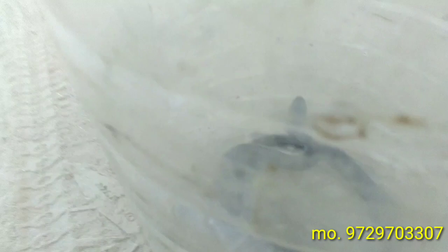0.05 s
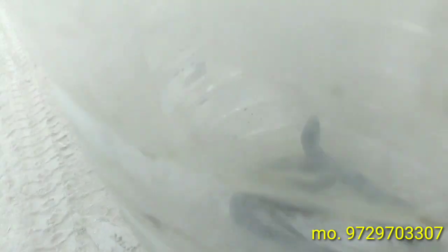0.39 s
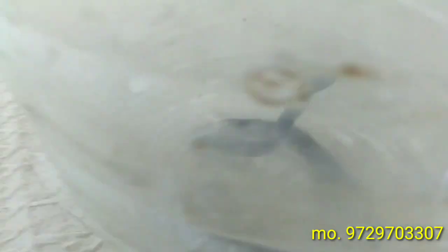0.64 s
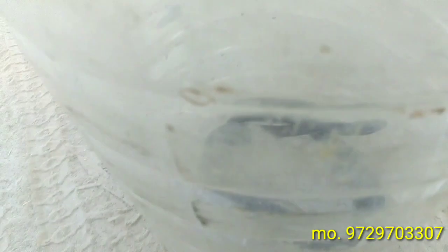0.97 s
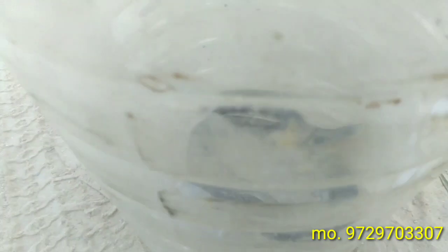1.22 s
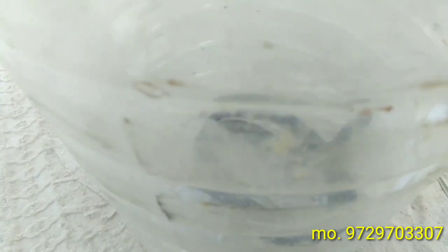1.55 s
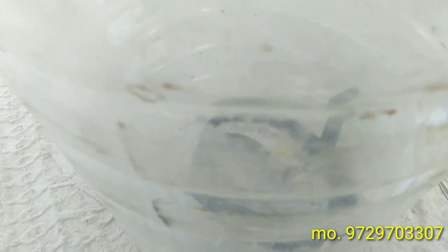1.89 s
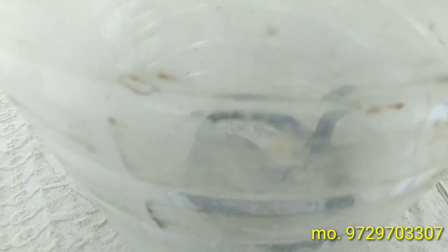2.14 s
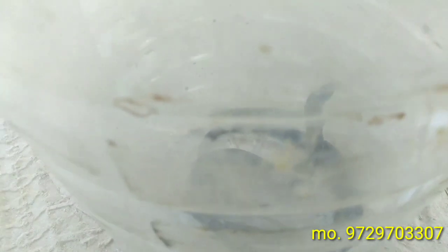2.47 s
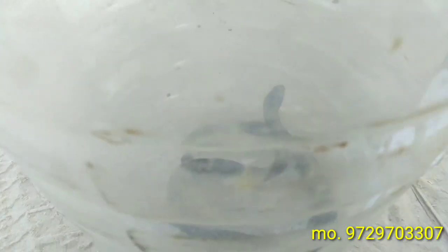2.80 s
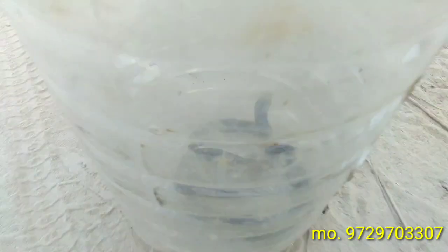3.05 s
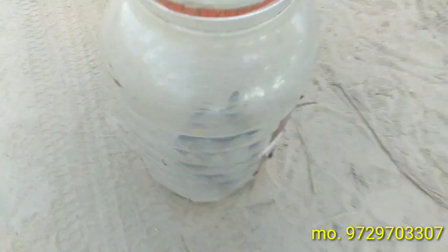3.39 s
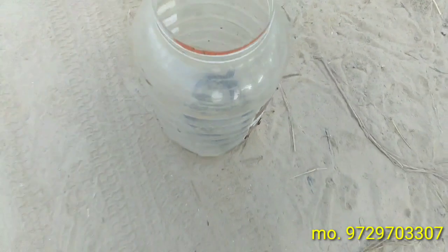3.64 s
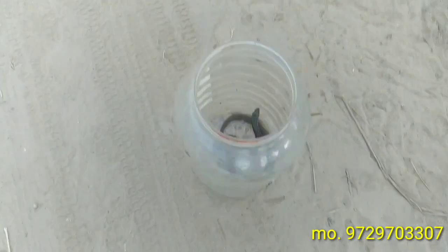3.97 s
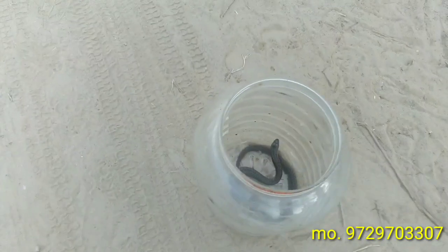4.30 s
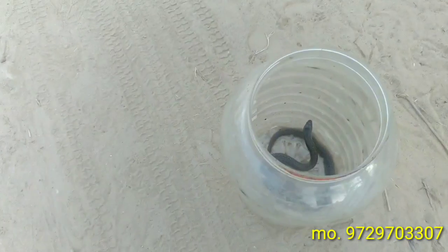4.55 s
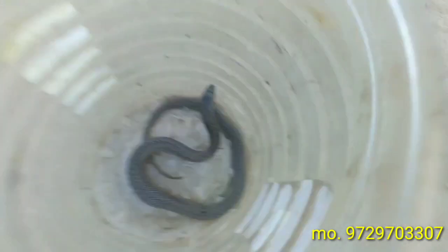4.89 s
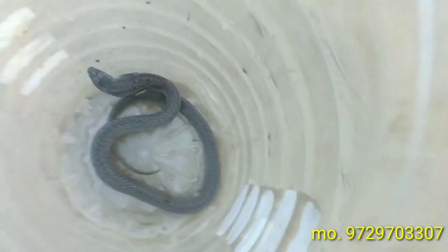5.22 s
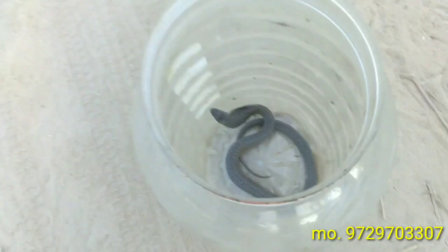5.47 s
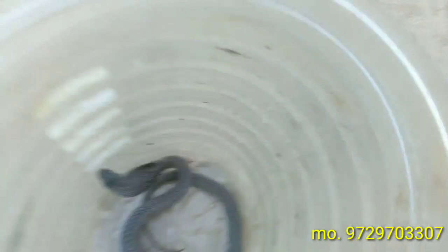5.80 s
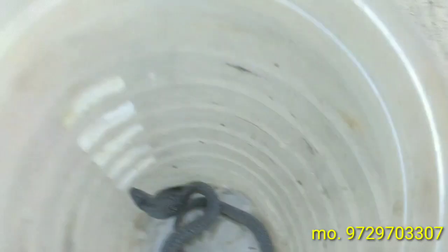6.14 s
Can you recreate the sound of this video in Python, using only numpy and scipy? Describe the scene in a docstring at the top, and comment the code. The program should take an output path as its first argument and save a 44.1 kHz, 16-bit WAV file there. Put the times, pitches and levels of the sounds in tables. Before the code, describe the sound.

A large plastic jar is turned on sandy ground, heard from very close. From the start until about 2.3 seconds it scrapes in short, uneven pushes, with a low judder, a gritty sand hiss and light hollow knocks of its wall. The strongest knocks and scrapes come between 1 and 1.8 seconds, mixed with tiny groans of rubbing plastic. From about 2.5 seconds dry, hissy brushing swishes close on the left, strongest around 3.4 and 4.2 seconds, while a few more light knocks fall between 3 and 4.3 seconds. At about 4.9 and 5.2 seconds the rim is bumped twice: hollow thuds with a dry clack, the loudest sounds, each followed by a brief low hum from inside the jar. Faint grit ticks, swishes and small scrapes continue to about 6 seconds. Quiet, steady outdoor air lies underneath throughout.

```python
"""Plastic jar turned on sand

A large empty plastic jar turns on sandy ground with a camera held against it: stick-slip scrapes and
light knocks ring its wall. The camera backs off, with dry brushing close to its left microphone port,
and bumps the rim twice; while it hangs in the jar's mouth the air inside hums.
Quiet outdoor air lies underneath."""
import sys
import numpy as np
from scipy import signal
from scipy.fft import rfft, irfft, next_fast_len
from scipy.io import wavfile
from scipy.ndimage import uniform_filter1d, minimum_filter1d, map_coordinates

SR = 44100
rng = np.random.default_rng(int(sys.argv[2]) if len(sys.argv) > 2 else 0)


def unload_wav(signal):
    """Save mono or channel-first audio to the path in sys.argv[1] as 16-bit WAV at rate SR, clipped to [-1, 1]."""
    wavfile.write(
        sys.argv[1],
        SR,
        np.round(np.clip(np.atleast_2d(signal).T, -1, 1) * 32767).astype(np.int16),
    )


N = 271068


def amp(db):
    """Decibels to gain."""
    return 10 ** (np.asarray(db) / 20)


def unit(x):
    """Scale to rms 1."""
    return x / np.sqrt(np.mean(x ** 2) + 1e-20)


def along(points, hz):
    """Read a curve of (Hz, value) points on a log frequency axis."""
    point_hz, values = np.transpose(points)
    return np.interp(np.log(hz + 1), np.log(point_hz + 1), values)


def wobble(rate):
    """A smooth random curve with `rate` knots a second."""
    return map_coordinates(rng.standard_normal(int(N * rate / SR) + 4), [np.arange(N) * rate / SR])


def filtered(x, response):
    """Equalise x with a gain given as a function of frequency."""
    size = next_fast_len(N + SR // 4)
    return irfft(rfft(x, size) * response(np.fft.rfftfreq(size, 1 / SR)), size)[..., :N]


def body(spectrum, modes=(), size=4096):
    """Minimum-phase impulse response of a tone curve lifted at its modes."""
    hz = np.fft.rfftfreq(size, 1 / SR)
    peaks_db = sum(lift / (1 + (2 * (hz - centre) / width) ** 2) for centre, width, lift in modes)
    cepstrum = irfft(np.log(amp(along(spectrum, hz) + peaks_db)))
    cepstrum[1:size // 2] *= 2
    cepstrum[size // 2 + 1:] = 0
    return irfft(np.exp(rfft(cepstrum)))


def through(x, response):
    """Ring both channels through an impulse response."""
    return signal.oaconvolve(x, response[None], axes=1)[:, :x.shape[1]]


def pan(lean_db):
    """Constant-power left and right gains; positive leans left."""
    gains = amp(np.array([lean_db, -lean_db]).reshape(2, -1) / 2)
    return gains / np.sqrt(np.mean(gains ** 2, axis=0))


def add(track, start_s, sound):
    """Mix a short sound into the track."""
    part = track[:, round(start_s * SR):][:, :sound.shape[1]]
    part += sound[:, :part.shape[1]]


def strokes(start_s, length_s, level_db, rise_db_per_s, fall_db_per_s, arch_db):
    """Envelope of one or more strokes, summed in power: each rises, arches and falls away."""
    start_s, length_s, level_db = (np.reshape(x, (-1, 1)) for x in (start_s, length_s, level_db))
    t = np.arange(0, N, 32) / SR
    since = t - start_s
    held = np.clip(since, 0, length_s)
    db = level_db - arch_db * (2 * held / length_s - 1) ** 2
    db = db - rise_db_per_s * np.maximum(held - since, 0) - fall_db_per_s * np.maximum(since - held, 0)
    return np.interp(np.arange(N) / SR, t, np.linalg.norm(amp(db), axis=0))


def slips(per_s, spread_db, smooth):
    """Friction: tiny random slips of uneven size over a share of smooth sliding noise."""
    size = (rng.random(N) < per_s / SR) * amp(spread_db * np.clip(rng.standard_normal(N), -2, 2))
    return unit(size * rng.standard_normal((2, N))) + smooth * rng.standard_normal((2, N))


def shifting(x, depth_db, size):
    """Resonances come and go as the contact shifts; patch size is in steps of (43 Hz, 12 ms)."""
    spectra = signal.stft(x, nperseg=1024)[2]
    patches = uniform_filter1d(rng.standard_normal(spectra.shape[1:]), size=size[0], axis=0)
    patches = uniform_filter1d(patches, size=size[1], axis=1)
    return unit(signal.istft(spectra * amp(depth_db * unit(patches)), nperseg=1024)[1][:, :N])


def burst(t, t60_s, response):
    """A dying spray of micro-contacts rung through a body; rms 1 over its first 10 ms."""
    spray = through(rng.standard_normal((2, len(t))) * amp(-60 * t / t60_s), response)
    return spray / np.sqrt(np.mean(spray[:, :SR // 100] ** 2, axis=1, keepdims=True))


# How alike the two ports sound: freq_hz, coherence
PORT_COHERENCE = [(100, 0.67), (700, 0.47), (1400, 0.08), (3000, 0.047), (15000, 0.36)]


def ports(pair):
    """Blend two unrelated noises into left and right, narrowest in the bass and widest near 3 kHz."""
    angle = lambda hz: np.arccos(np.clip(along(PORT_COHERENCE, hz), -1, 1)) / 2
    mid, side = filtered(pair, lambda hz: np.array([np.cos(angle(hz)), np.sin(angle(hz))]))
    return unit(np.array([mid + side, mid - side]))


# Tone curve of the open air: freq_hz, gain_db
AIR_TONE = [(30, -57), (80, -20.5), (190, 8.5), (400, -1), (800, -6.5), (3500, -18), (16000, -24.5)]


def outdoor_air():
    """A faint, nearly steady bed of low air noise."""
    return amp(-48.5 + 0.71 * wobble(7.3)) * ports(through(rng.standard_normal((2, N)), body(AIR_TONE)))


# Swells of the jar's air after each rim bump: start_s, length_s, level_db
HUMS = [(5.044, 0.063, -21), (5.235, 0.052, -23)]
CAVITY_HZ, FIRST_BUMP_S = 214.5, 4.942


def cavity_hum():
    """The jar's air spring hums after the bumps and stirs faintly with each scrape."""
    phase = 2 * np.pi * np.cumsum(CAVITY_HZ * (1 + .004 * wobble(19))) / SR
    air_column = amp(-37 + 3 * wobble(40)) * np.sin(3.3 * phase + wobble(60))
    start_s, length_s, db = np.transpose(HUMS)
    swell = strokes(start_s, length_s, db, rise_db_per_s=207, fall_db_per_s=288, arch_db=-.5)
    tail = strokes(start_s, length_s, db - 15.5, rise_db_per_s=207, fall_db_per_s=69, arch_db=-.5)
    judder_db = np.transpose(SCRAPES)[2]
    struck = np.clip((np.arange(N) / SR - FIRST_BUMP_S) / .005, 0, 1)
    envelope = struck * np.hypot(swell, tail) + pushes(judder_db - 45)
    return envelope * pan(-5) * np.sqrt(2) * (np.sin(phase) + air_column)


# Tone curve of a cracking grain: freq_hz, gain_db
TICK_TONE = [(800, -72), (3000, 10.5), (8000, 15), (12000, 12.5), (16000, 4)]


def grit_tick(t, db):
    """A grain cracks, mostly at the left port."""
    return amp(db - 8.5) * amp([[0], [-11]]) * burst(t, t60_s=.011, response=body(TICK_TONE))


# Stray grains: start_s, relative_level_db
LOOSE_GRAINS = [(5.483, -29), (5.49, -37), (5.606, -29.5), (5.629, -33)]


def loose_grains():
    """A few loose grains tick near the left port."""
    track, t = np.zeros((2, N)), np.arange(SR // 5) / SR
    for start_s, db in LOOSE_GRAINS:
        add(track, start_s, grit_tick(t, db))
    return track


# Tone curves of the fine and the coarse hiss: freq_hz, gain_db
FINE_TONE = [(2500, -18), (5000, -15), (7000, -6), (9500, -0.5), (11000, -4), (13000, -14.5), (15800, -19)]
COARSE_TONE = [(300, -28), (1100, 2.5), (2400, 4.5), (4500, 6.5), (6500, 3.5), (10000, -0.5)]


def grain_hiss(fine_gain, coarse_gain, sheen_gain):
    """Dense dry grains hiss in clumps at a port that rings broadly near 10 kHz; larger ones tick."""
    grains = lambda tone: unit(through(slips(per_s=6000, spread_db=3, smooth=.8), body(tone)))
    clumped = lambda x: shifting(x, depth_db=2.1, size=(36, 2))
    sheen_tone = [(8000, -12), (13000, 5.5), (15000, 1.5)]  # the glassy top: freq_hz, gain_db
    fine = clumped(shifting(grains(FINE_TONE), depth_db=2.6, size=(4, 4)))
    sheen = clumped(shifting(grains(sheen_tone), depth_db=2.6, size=(4, 4)))
    coarse = shifting(grains(COARSE_TONE), depth_db=3.2, size=(7, 4))
    ticks = amp(-24) * unit(through(slips(per_s=150, spread_db=1, smooth=0), body(TICK_TONE)))
    pressure = amp(0.5 * wobble(21.59) + 0.7 * wobble(70))
    return pressure * (fine_gain * (fine + ticks) + sheen_gain * sheen + coarse_gain * coarse)


# Dry swishes at the left port: start_s, length_s, fine_db, coarse_over_fine_db, sheen_over_fine_db
SWISHES = [(2.515, 0.49, -37.5, -8.5, -2.5), (3.066, 0.21, -34.5, -9, 1), (3.308, 0.05, -26, -2.5, -4),
           (3.362, 0.045, -25.5, -2.5, -6), (3.388, 0.095, -20.5, -12.5, -4.5), (3.466, 0.2, -32.5, -7, -3),
           (3.663, 0.59, -42, -4.5, -4), (3.951, 0.57, -31.5, -5, -8), (4.195, 0.13, -23.5, -10.5, -3),
           (4.464, 0.17, -32, -7.5, -4), (4.654, 0.27, -30.5, -7.5, 1), (5.078, 0.16, -39.5, -7, -1.5),
           (5.297, 0.2, -36, -11.5, -2), (5.625, 0.23, -34.5, -5, -3.5), (5.913, 0.035, -36, -6, -5),
           (6.012, 0.1, -39.5, -14, -3)]


def brushing():
    """Sand hisses with each scrape, louder on the left; the swishes barely reach the right port."""
    *_, hiss_db, _, _ = np.transpose(SCRAPES)
    sand = pushes(hiss_db)
    sand_fine = amp([[0], [-16]]) * sand
    sand_coarse = amp(-5.5) * sand_fine
    sand_sheen = amp(-7.5) * amp([[0], [-7.5]]) * sand
    start_s, length_s, fine_db, coarse_db, sheen_db = np.transpose(SWISHES)

    def swish(db, rest_db):
        """Brush strokes over a faint floor: the grip never lies quite still."""
        gain = strokes(start_s, length_s, db, rise_db_per_s=299, fall_db_per_s=315, arch_db=3.5)
        return amp([[0], [-34]]) * np.hypot(gain, amp(rest_db))

    fine = np.hypot(sand_fine, swish(fine_db, rest_db=-48))
    coarse = np.hypot(sand_coarse, swish(fine_db + coarse_db, rest_db=-57))
    sheen = np.hypot(sand_sheen, swish(fine_db + sheen_db, rest_db=-56.5))
    return grain_hiss(fine, coarse, sheen)


# Short groans and a squeak: start_s, length_s, pitch_hz, level_db, lean_left_db
GROANS = [(1.313, 0.032, 207.5, -16.5, -4), (1.696, 0.038, 250, -23, -7), (2.175, 0.018, 217.5, -23, -22),
          (2.231, 0.047, 733, -34.5, 0)]


def groans():
    """The slide locks into regular stick-slip: an unsteady tone with a weak octave."""
    track = np.zeros((2, N))
    for start_s, length_s, hz, db, lean_db in GROANS:
        phase = 2 * np.pi * np.cumsum(hz * (1 + 0.044 * wobble(90))) / SR
        gain = strokes(start_s, length_s, db, rise_db_per_s=5000, fall_db_per_s=700, arch_db=0)
        track += pan(lean_db) * gain * np.sqrt(2) * (np.sin(phase) + amp(-14) * np.sin(2 * phase))
    return track


PUSH_RISE_DB_PER_S, PUSH_FALL_DB_PER_S, PUSH_ARCH_DB = 723, 534, 4


def pushes(level_db):
    """Envelope of the scrapes: each push catches fast, peaks midway and lets go a little more slowly."""
    start_s, length_s = np.transpose(SCRAPES)[:2]
    return strokes(start_s, length_s, level_db, PUSH_RISE_DB_PER_S, PUSH_FALL_DB_PER_S, PUSH_ARCH_DB)


# Modes of the jar's wall and air column: freq_hz, width_hz, lift_db
JAR_MODES = [(230, 25, 1), (342, 190, 4.5), (705, 400, 7.5), (1050, 170, 4.5), (1420, 250, 8.5),
             (1730, 63, 6.5), (2440, 67, 2), (3470, 88, 10), (3780, 55, 8)]


def rubbed_wall(friction, tone, spots_hz, level_db, width_hz, lift_db, fall_db_per_s=PUSH_FALL_DB_PER_S):
    """Slips ring the wall, push by push; each push lifts the resonance of the spot it rubs."""
    track, friction = np.zeros((2, N)), ports(friction)
    for (start_s, length_s, *_), hz, db in zip(SCRAPES, spots_hz, level_db):
        part = slice(max(round((start_s - .06) * SR), 0), round((start_s + length_s + .15) * SR))
        gain = strokes(start_s, length_s, db, PUSH_RISE_DB_PER_S, fall_db_per_s, PUSH_ARCH_DB)
        wall = body(tone, JAR_MODES + [(hz, width_hz, lift_db)])
        track[:, part] += gain[part] * unit(through(friction[:, part], wall))
    return track


# Tone curves of a scrape's low judder, mid rasp and gritty crunch: freq_hz, gain_db
JUDDER_TONE = [(30, -29), (90, -34), (130, -18.5), (180, -3), (300, -12), (460, -10), (750, -28),
               (2000, -46)]
RASP_TONE = [(250, -34), (430, 4), (580, -5), (1150, -3), (1500, -15.5), (2500, -47), (6000, -72)]
CRUNCH_TONE = [(700, -6), (1200, -10.5), (1550, 3), (2400, 6), (3100, -4), (5000, -7), (16000, -53)]
# Pushes that scrape the jar: start_s, length_s, judder_db, rasp_over_judder_db,
# crunch_over_judder_db, hiss_db, judder_hz, rasp_hz
SCRAPES = [(0.0, 0.1, -32.5, -7.5, -10, -38, 326, 1110), (0.126, 0.086, -27, -8, -13, -37.5, 344, 1080),
           (0.23, 0.047, -24.5, -5, -10, -30, 340, 1440), (0.277, 0.068, -32.5, 2, -0.5, -30, 306, 1080),
           (0.373, 0.16, -28, -4, -6, -27, 362, 1103), (0.54, 0.18, -33.5, -8.5, -9.5, -36.5, 230, 1160),
           (0.717, 0.11, -37, -7.5, -11, -41.5, 220, 700), (0.88, 0.13, -30.5, -.5, 0, -22.5, 293, 1460),
           (1.025, .089, -31, -15, -19, -45.5, 224, 700), (1.298, 0.086, -23.5, -5, -8, -21, 328, 690),
           (1.39, .12, -34, -1, -1, -27, 202, 630), (1.598, 0.022, -32, -6.5, -10, -41.5, 245, 1390),
           (1.68, 0.076, -22, -6, -10, -22, 200, 720), (1.763, 0.043, -30, -6, -10, -27.5, 190, 1040),
           (2.056, 0.027, -33, -15, -32, -62, 200, 700), (2.107, .16, -26.5, -6.5, -9, -26, 190, 1040),
           (2.781, 0.097, -45.5, -2.5, -7, -51, 240, 775), (3.417, 0.019, -30, -11, -17, -58, 405, 840),
           (3.522, 0.17, -41.5, -3, -5, -57, 173, 660), (4.075, 0.25, -47.5, -2, 2, -54, 242, 1410),
           (5.064, 0.072, -37.5, -8, -3, -62, 230, 720), (5.727, 0.016, -37.5, 0.5, -9, -55, 280, 640),
           (5.791, 0.037, -36, -3, -12, -33.5, 370, 670), (5.916, 0.031, -38, -2, -11, -52, 397, 830),
           (6.058, 0.0092, -38.5, -1.5, -11, -55, 310, 690)]


def scraping():
    """Slow stick-slip shakes the whole jar, quicker slips rasp in its wall, and single grains crunch."""
    _, _, judder_db, rasp_db, crunch_db, _, judder_hz, rasp_hz = np.transpose(SCRAPES)
    slow = slips(per_s=420, spread_db=5, smooth=0.65)
    quick = slips(per_s=700, spread_db=1.5, smooth=1.0)
    judder = rubbed_wall(slow, JUDDER_TONE, judder_hz, judder_db, width_hz=210, lift_db=7.5,
                         fall_db_per_s=308)  # outlasts the grit
    rasp = rubbed_wall(quick, RASP_TONE, rasp_hz, judder_db + rasp_db, width_hz=140, lift_db=8)
    grit = ports(through(slips(per_s=600, spread_db=3, smooth=1.0), body(CRUNCH_TONE, JAR_MODES)))
    grit_gain = np.hypot(pushes(judder_db + crunch_db), amp(-63))  # the grip rubs faintly between pushes
    crunch = shifting(grit, depth_db=3.2, size=(6, 6)) * grit_gain
    catching = amp(1.8 * wobble(45))
    return pan(-1) * catching * (judder + rasp + crunch)


# Tone curve of a knock's clack: freq_hz, gain_db
KNOCK_CLACK_TONE = [(150, -32.5), (400, 4), (900, -3), (1500, -9.5), (2300, -8.5), (3200, -17.5),
                    (6000, -28), (16000, -57)]
# Partials of the struck spot: pitch_ratio, gain_db, t60_s
SPOT_PARTIALS = [(.66, -13, 0.011), (.86, -6, .016), (1, 1, 0.036), (1.17, -5, 0.013), (1.9, -18, 0.03)]
# Knocks on the wall, levels before their trims: start_s, thud_hz, thud_t60_s, thud_db,
# hardness_db (clack over thud), tick_db, lean_left_db, spot_hz, ring_db
KNOCKS = [(0.128, 376, 0.046, -33, -0.5, -31, 6, 1110, -45),
          (0.184, 444, 0.019, -28.5, -8, -48, 7, 1450, -42),
          (0.633, 218, 0.031, -20.5, -17, -40, -4.5, 445, -31),
          (0.668, 280, 0.043, -23, -4, -23.5, 10, 1130, -42),
          (0.755, 660, 0.045, -25, -13, -51, -10, 1480, -36),
          (0.778, 310, 0.02, -20.5, -7.5, -24.5, 4, 1260, -31),
          (1.0434, 382, 0.065, -22.5, 7.5, -16.5, -8, 2010, -15.5),
          (1.086, 345, 0.036, -34, 0, -51, -12, 1100, -41),
          (1.263, 234, 0.047, -10.5, -9, -17, -3.5, 496, -16),
          (1.366, 200, 0.048, -19.5, -0.5, -16, -2, 1740, -14),
          (1.372, 505, 0.019, -21, 6, -12, -5, 1720, -21),
          (1.397, 510, 0.088, -25.5, 6.5, -36, -2, 1650, -26),
          (1.402, 700, 0.034, -31, 0, -50, -4, 1040, -23),
          (1.661, 196, 0.066, -19.5, -15, -52, -13, 476, -32),
          (1.67, 328, 0.021, -21.5, -2, -21, -5, 1420, -33),
          (1.687, 274, 0.069, -18.5, 4, -35, -5, 1740, -20),
          (1.812, 210, .084, -22.5, -7.5, -56, -10, 650, -27.5),
          (2.044, 204, 0.031, -31, -8, -60, -13, 480, -37), (2.073, 240, .041, -28, -15, -49, 16, 650, -38),
          (2.144, 744, 0.056, -23.5, -1, -45, 3, 1050, -26),
          (2.247, 605, 0.064, -28.5, 0, -18, -7, 1500, -30), (2.262, 730, 0.13, -28, 3, -36, -2, 990, -23),
          (2.98, 248, 0.019, -20, -14.5, -26, 6, 1400, -43),
          (2.984, 500, 0.056, -29, -12, -50, 2, 1400, -44), (3.031, 488, 0.073, -25, -8, -14, 6, 2120, -32),
          (3.041, 503, .049, -33, 1, -22, 21, 1870, -26), (3.172, 263, 0.061, -40, 0, -20, 1, 1930, -53),
          (3.406, 358, 0.03, -21.5, -8, -42, -31, 855, -35),
          (3.84, 209, 0.06, -21.5, -10.5, -58, -28, 560, -27),
          (3.919, 640, 0.019, -41, -1, -33, 6, 1100, -46), (4.22, 276, 0.031, -32.5, -11, -41, 0, 600, -43),
          (4.277, 362, .027, -31.5, -6, -41, -23, 1510, -46),
          (5.71, 244, 0.02, -29.5, -15, -48, 7, 700, -47)]
CONTACT_WIDTH_RATIO = 0.62  # scales the width of the jar's modes during a knock


def knocks():
    """Each contact is a damped thud of flexing plastic, a clack and ring of the spot, and a grit tick."""
    track, t = np.zeros((2, N)), np.arange(SR // 5) / SR
    modes = [(hz, width * CONTACT_WIDTH_RATIO, lift) for hz, width, lift in JAR_MODES]
    for start_s, hz, t60_s, thud_db, hardness_db, tick_db, lean_db, spot_hz, ring_db in KNOCKS:
        # the dent is stiffest at first, so the thud starts sharp
        phase = 2 * np.pi * np.cumsum(hz * (1 + .3 * np.exp(-t / .002))) / SR
        thud = -np.sin(phase) * amp(-60 * t / t60_s) * (1 - np.exp(-t / .0016))
        thud = amp(thud_db - 2) * thud / np.std(thud[:SR // 100])
        # a harder knock favours its own spot more
        spot_mode = (spot_hz, spot_hz / 2, max(8.5 + 0.7 * hardness_db, 0))
        clack = burst(t, t60_s=.022, response=body(KNOCK_CLACK_TONE, modes + [spot_mode]))
        ring = sum(amp(db - 60 * t / life) * np.sin(2 * np.pi * ratio * spot_hz * rng.normal(1, .012) * t)
                   for ratio, db, life in SPOT_PARTIALS)
        wall = amp(thud_db + hardness_db) * clack + amp(ring_db) * ring
        add(track, start_s, pan(lean_db) * thud + pan(lean_db / 2) * wall + grit_tick(t, tick_db))
    return track


# Tone curve of the rim's clack: freq_hz, gain_db
RIM_CLACK_TONE = [(150, -33), (400, 6.5), (600, 4.5), (1080, -8), (1550, -5.5), (1950, -15), (2500, -15.5),
                  (4000, -28), (16000, -55)]
# Two rim bumps and their rebounds, levels before their trims:
# start_s, thud_hz, thud_db, clack_db, tick_db, lean_left_db
RIM_BUMPS = [(4.9408, 277, -4, -12.5, -12, -6.5), (4.953, 258, -1, -14, -27, -17),
             (5.153, 265, -5.5, -11, -12.5, -4), (5.164, 260, -13, -36, -42, -14),
             (5.1685, 297, -6, -22.5, -42, -24), (5.1895, 257, -7.5, -27, -54, -13),
             (5.1986, 263, -8, -29, -57, -12)]
BUMP_PEAK_S, BUMP_TIGHTNESS = 0.0032, 1.74  # a tighter thud is gone sooner


def rim_bumps():
    """The camera meets the rim with a dry clack; the neck gives way in a hollow, quickly damped thud."""
    track, t = np.zeros((2, N)), np.arange(SR // 10) / SR
    swell = (t / BUMP_PEAK_S * np.exp(-t / BUMP_PEAK_S)) ** BUMP_TIGHTNESS
    for start_s, hz, thud_db, clack_db, tick_db, lean_db in RIM_BUMPS:
        thud = -np.sin(2 * np.pi * hz * t) * swell
        thud = amp(thud_db - 4) * thud / np.std(thud[:SR // 100])
        clack = amp(clack_db) * burst(t, t60_s=0.033, response=body(RIM_CLACK_TONE))
        add(track, start_s, pan(lean_db) * thud + pan(lean_db / 2) * clack + grit_tick(t, tick_db))
    return track


def scene():
    """The stereo mix at the two ports: friction, impacts, the jar's hum and the air bed."""
    friction = scraping() + groans() + brushing()
    impacts = knocks() + loose_grains() + rim_bumps()
    return friction + impacts + cavity_hum() + outdoor_air()


LOW_CUT_HZ, HIGH_CUT_HZ = 164, 15750


def record(dry):
    """The ports lose the deep bass, a quick limiter holds the hardest bumps, and the very top is cut."""
    thinned = filtered(dry, lambda hz: 1j * hz / (LOW_CUT_HZ + 1j * hz))
    needed_gain = 1 / np.maximum(np.abs(thinned).max(axis=0), 1)
    limiter = uniform_filter1d(minimum_filter1d(needed_gain, size=90), size=90)
    return filtered(thinned * limiter, lambda hz: hz < HIGH_CUT_HZ)


dry = scene()
out = record(dry)
unload_wav(out)
```